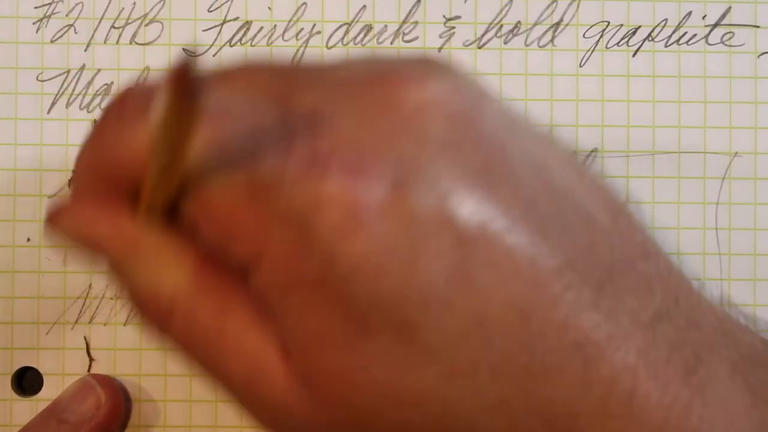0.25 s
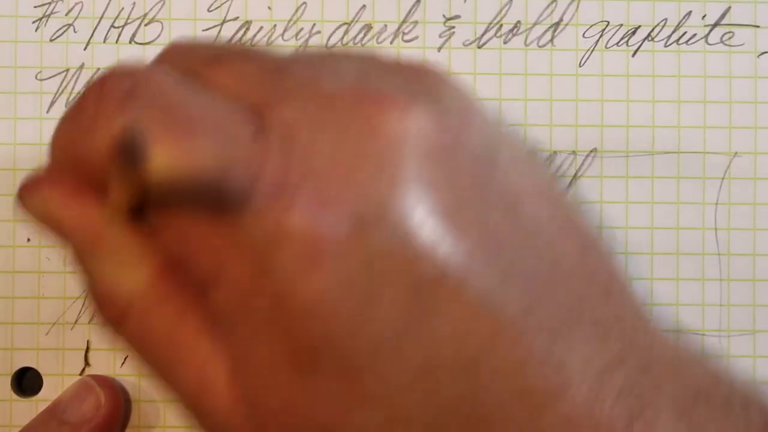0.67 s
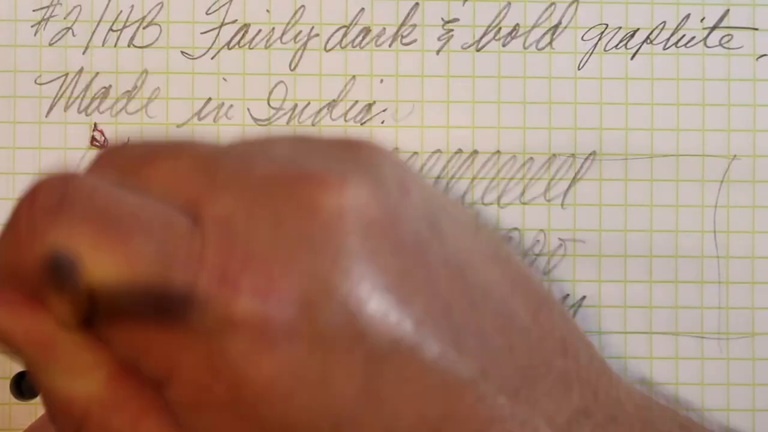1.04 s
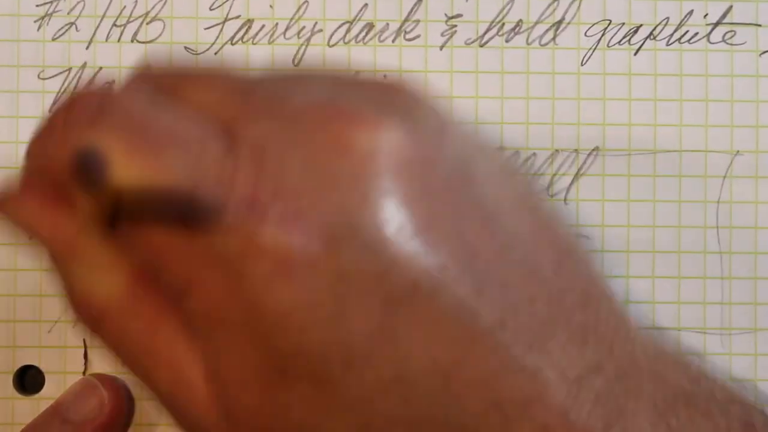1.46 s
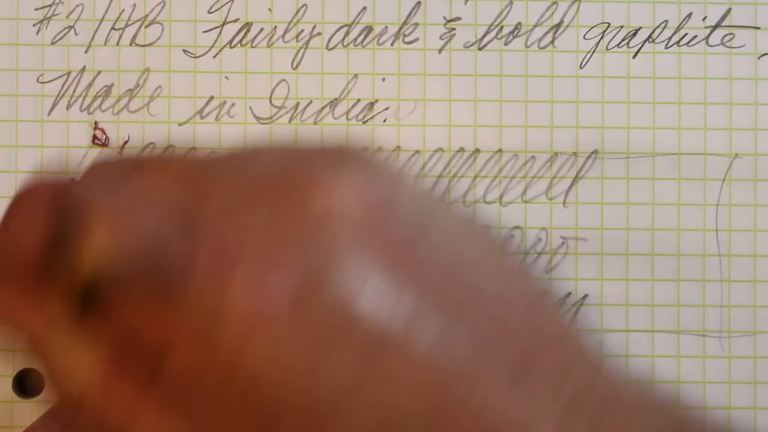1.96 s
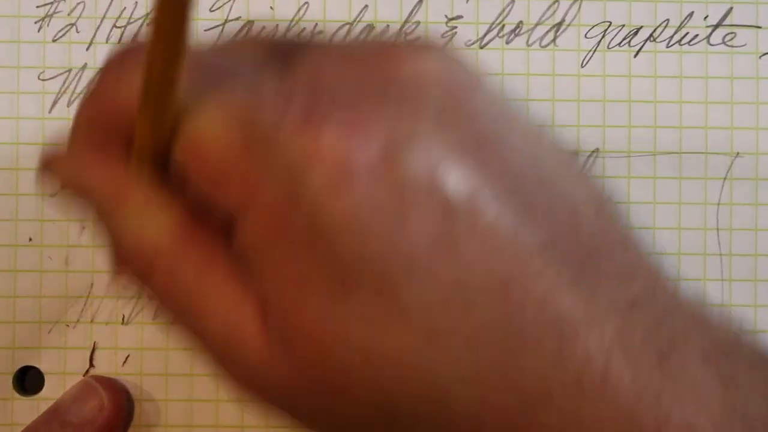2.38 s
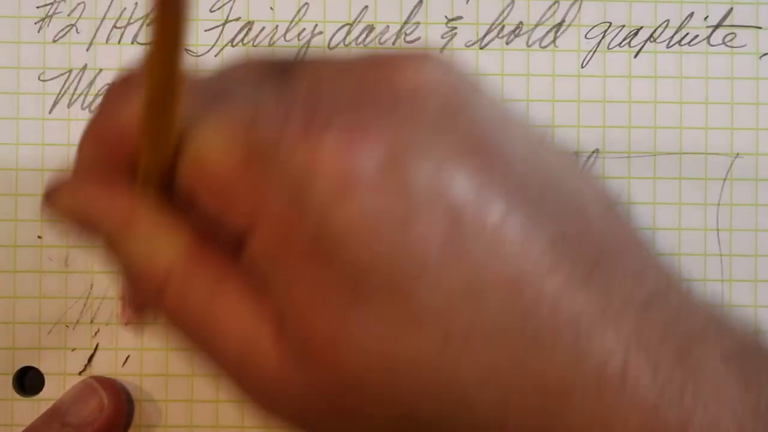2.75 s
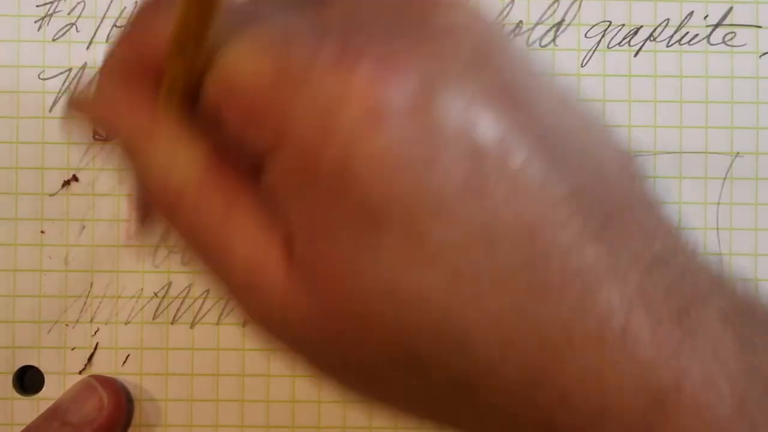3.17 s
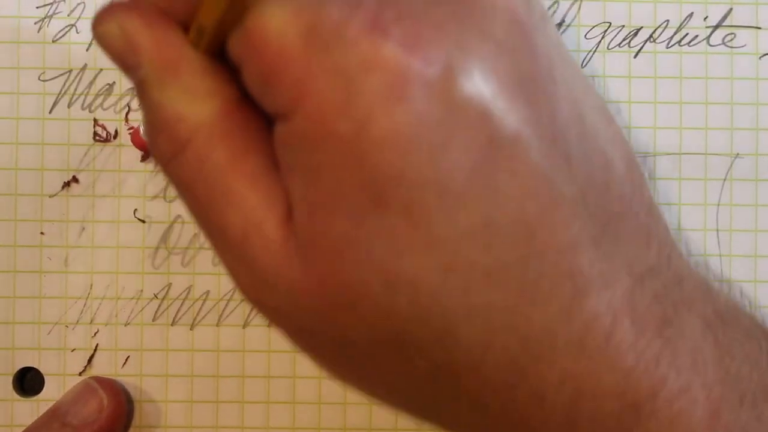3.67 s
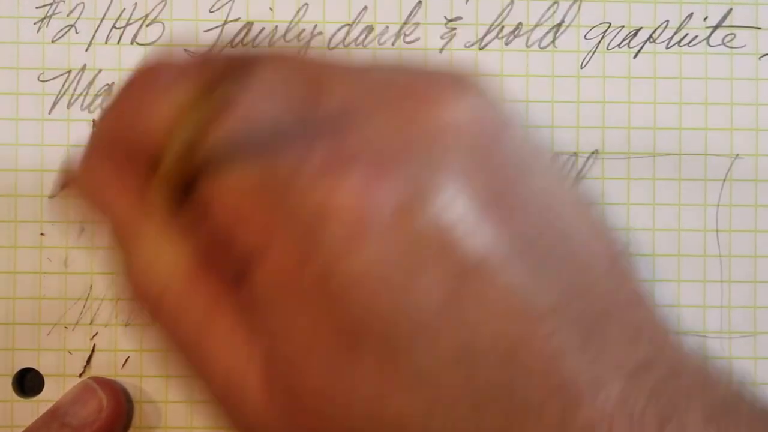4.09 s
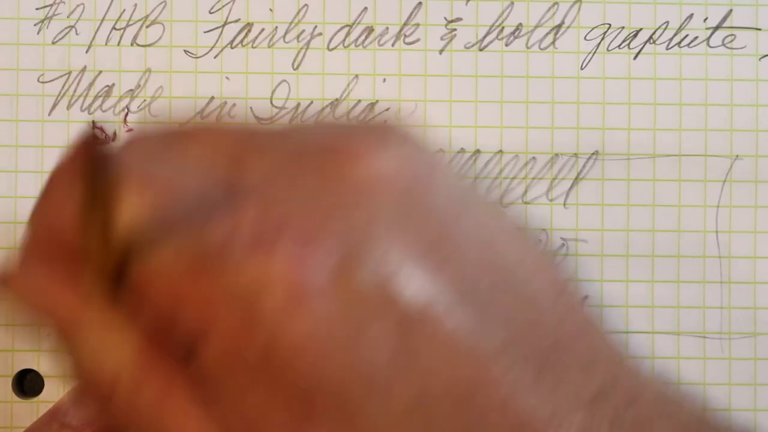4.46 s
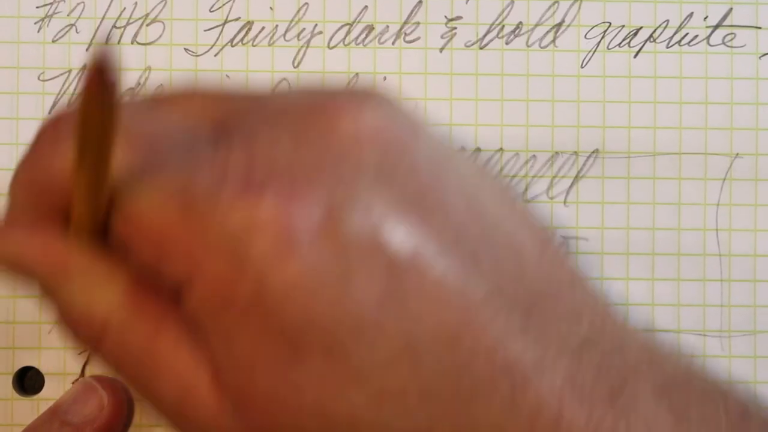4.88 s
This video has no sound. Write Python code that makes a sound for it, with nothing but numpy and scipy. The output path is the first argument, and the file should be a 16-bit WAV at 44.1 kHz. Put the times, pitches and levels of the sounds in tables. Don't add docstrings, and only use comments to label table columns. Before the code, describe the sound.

In a quiet room, miked closely in stereo, an eraser scrubs paper without pause. Alternating strokes give brief dry bursts of bright hiss and papery rasp, the early ones lighter, later ones heavier and scrapier with more pad sound. Dull wooden thumps with tinny rattles peak near two seconds, then mostly soft bumps, paper snaps and small creaks continue. Very short wall echoes, low room noise.

```python
import sys
import numpy as np
from scipy import signal
from scipy.fft import rfft, irfft, next_fast_len
from scipy.io import wavfile

SR = 44100
rng = np.random.default_rng(int(sys.argv[2]) if len(sys.argv) > 2 else 0)


def to_wav(s):
    ch = np.atleast_2d(s).T
    pcm = np.round(np.clip(ch, -1, 1) * 32767)
    wavfile.write(sys.argv[1], SR, pcm.astype(np.int16))


def decibels_to_gain(level_db):
    exponent = np.asarray(level_db, float) / 20
    return 10 ** exponent


N = 226385

# start_s, peak_db, boom_hz, push_s
HAND_THUMPS = [(0.003, -40, 237, 0.049), (0.403, -35.5, 245, 0.018), (0.702, -30.5, 342, 0.0079),
               (0.749, -36.5, 241, 0.012), (0.801, -43.5, 258, 0.014), (0.959, -29.5, 205, 0.024),
               (1.117, -38.5, 232, 0.017), (1.2998, -19.5, 215, 0.012), (1.343, -36, 260, 0.0087),
               (1.427, -43.5, 418, 0.0091), (1.503, -33, 263, 0.0034), (1.599, -17.5, 229, 0.011),
               (1.8845, -13, 205, 0.014), (2.099, -41, 336, 0.023), (2.168, -19.5, 188, 0.016),
               (2.281, -37, 172, 0.009), (2.362, -31.5, 240, 0.013), (2.394, -33, 237, 0.016),
               (2.909, -32, 239, 0.019), (3.107, -30.5, 230, 0.02), (3.299, -37.5, 226, 0.013),
               (3.486, -33.5, 249, 0.017), (3.817, -38, 164, 0.012), (3.859, -32.5, 236, 0.02),
               (4.082, -28, 197, 0.016), (4.36, -41, 220, 0.019), (4.612, -32, 254, 0.015),
               (4.684, -31.5, 232, 0.018), (4.857, -39, 247, 0.0044), (5.001, -33.5, 241, 0.013),
               (4.959, -36, 129, .03), (4.115, -39.5, 260, 0.016), (1.012, -40.5, 272, 0.021),
               (.43, -43, 326, 0.012)]
# freq_hz, density_db (per Hz)
LOW_SHAKE = [(15, -37), (25, -9), (97, -1.5), (170, -8), (220, -31), (370, -120)]
# freq_hz, density_db (per Hz)
AIRY_TOP = [(6200, -1.5), (7200, -2), (8000, -3), (8800, -2), (10000, -6.5), (11500, -11), (13500, -13.5),
            (15800, -25)]


def rms_one(x):
    return x / np.sqrt(np.mean(x ** 2) + 1e-20)


def in_time(rows):
    s, *columns = np.transpose(rows)
    return np.array([np.interp(np.arange(N) / SR, s, c) for c in columns])


def at_hz(points, hz):
    freqs, values = np.array(points).T
    return np.interp(np.log(hz), np.log(freqs), values)


def butter(x, kind, hz, order=2):
    return signal.sosfilt(signal.butter(order, hz, kind, fs=SR, output="sos"), x)


def drift(rate):
    r = np.exp(-80 * np.pi * rate / SR)
    white = rng.standard_normal(N // 40 + 2002)
    slow = signal.lfilter([1], [1, -2 * r, r * r], white)[2000:]
    return np.repeat(rms_one(slow), 40)[:N]


def ring(force, hz, t60):
    r, w = decibels_to_gain(-60 / (t60 * SR)), 2 * np.pi * hz / SR
    return signal.lfilter([0, np.sin(w)], [1, -2 * r * np.cos(w), r * r], force + 1e-18)


def slips(per_s, spread_db):
    shape = (2, 2, N)
    size_db = spread_db * np.minimum(rng.exponential(1, shape), 5)
    sizes = decibels_to_gain(size_db) * rng.choice([-1, 1], shape)
    return sizes * (rng.random(shape) < per_s / SR) + 1e-9


def banded(source, spectrum, low_hz, high_hz, count, patchy_db, rate, alike=1.0):
    # freq_hz, likeness (0-1)
    capsule_likeness = [(60, 0.5), (150, 0.94), (380, 0.49), (950, 0.83), (2380, 0.64), (5980, 0.91),
                        (15000, 0.78)]
    out, edges_hz = 0, np.geomspace(low_hz, high_hz, count + 1)
    for k, (low, high) in enumerate(zip(edges_hz, edges_hz[1:])):
        mid, side = butter(source[k % 2], "band", [low, high])
        hz = np.sqrt(low * high)
        like = np.clip(alike * at_hz(capsule_likeness, hz), 0, .97)
        gain = decibels_to_gain(at_hz(spectrum, hz) + patchy_db * drift(rate))
        spread = np.sqrt(1 - like) * side * np.array([[1], [-1]])
        out = out + gain * (np.sqrt(1 + like) * mid + spread)
    return rms_one(out)


def bursts(events, lengths_s, smooth):
    force = np.zeros(N)
    noise = rng.standard_normal((len(events), 4000))
    t = np.arange(4000) / SR
    for row, length, rough in zip(events, lengths_s, noise):
        length = max(length, .001)
        shape = np.exp(-t / length) * rough / np.sqrt(length * SR / 2)
        shape[0] += smooth
        at = round(row[0] * SR)
        force[at:at + 4000] += decibels_to_gain(row[1]) * shape[:N - at]
    return force


def motion():
    # start_s, length_s, lateness (of top speed), hiss_db, weight_db (on the pad)
    pushes = [(0.108, 0.12, 0.77, -47.5, -2), (0.445, 0.1, 1.17, -46.5, -1.5),
              (0.779, 0.085, 0.66, -50.5, 0.5), (1.062, 0.083, 0.44, -49.5, -0.5),
              (1.321, 0.1, 1, -49, -2.5), (1.578, 0.14, 1.1, -48.5, -2), (1.878, 0.14, 0.87, -54, 9.5),
              (2.285, 0.078, 0.59, -56, 5), (2.63, 0.13, 0.88, -50, 4.5), (3.059, 0.089, 1.2, -49.5, 3),
              (3.416, 0.094, 0.78, -57, 8), (3.78, 0.13, 1.2, -52, 6.5), (4.148, 0.1, 0.69, -51.5, 2.5),
              (4.468, 0.11, 1.12, -49, 0.5), (4.782, 0.11, 1.2, -53, 6.5), (5.105, 0.028, 2.4, -52, 7)]
    # start_s, length_s, lateness, hiss_db, weight_db
    pulls = [(0.318, 0.059, 1.17, -45, -4.5), (0.616, 0.095, 1.05, -47.5, -1),
             (0.932, 0.06, 0.83, -48.5, 2), (1.217, 0.083, 0.6, -46, -2.5), (1.5, 0.074, 0.57, -46.5, -3),
             (1.783, 0.077, 0.69, -43.5, -5.5), (2.065, 0.099, 0.66, -49.5, 2),
             (2.413, 0.13, 1.14, -47.5, 2), (2.824, 0.12, 1.1, -45, -2.5), (3.21, 0.11, 1.07, -45, -2.5),
             (3.583, 0.063, 0.58, -52.5, 5.5), (3.972, 0.098, 1.8, -47, -2.5),
             (4.306, 0.1, 1.44, -50.5, 2.5), (4.633, 0.097, 1.4, -47, -4), (4.96, 0.072, 1.13, -47, -2)]
    for base_shake_db, cruise, rows in ((-13, 1.15, pushes), (-16.5, 1.03, pulls)):
        for s, length, lateness, hiss_db, weight_db in rows:
            progress = np.arange(round(length * SR)) / (length * SR)
            at = round(s * SR)
            speed = np.minimum(cruise * np.sin(np.pi * progress ** lateness), 1)[:N - at]
            shake_db = base_shake_db + 1.75 * weight_db
            yield slice(at, at + len(progress)), speed, hiss_db, weight_db, shake_db


def paper(source):
    # freq_hz, width_hz, level_db
    sheet_modes = [(2260, 32, -5), (2610, 47, 3), (3554, 35, 0.5), (4190, 65, -6), (4930, 190, -2),
                   (5510, 62, -2), (6320, 37, -2), (7120, 43, 1.5), (7540, 70, -9), (8530, 120, -5),
                   (10100, 53, -12.5), (11000, 46, -11)]
    out = 0
    for k, (hz, width_hz, db) in enumerate(sheet_modes):
        t60 = np.log(1000) / (np.pi * max(0.31 * width_hz, 20))
        mid, side = ring(source[k % 2], hz, t60)
        stereo = mid + 0.39 * side * np.array([[1], [-1]])
        out = out + decibels_to_gain(db + 3.5 * drift(9.6)) * stereo / mid.std()
    return rms_one(out)


def rubber():
    # time_s, level_db
    face_contact = [(0, 1), (.5, 0.5), (.95, -2.5), (1.37, 0), (1.8, -1.5), (2.1, -2), (2.5, 1.5), (3.3, 0),
                    (3.6, -3), (3.85, 2), (4.15, -2), (4.35, 3.5), (5.13, -3)]
    # freq_hz, density_db (per Hz)
    rasp_spectrum = [(3300, -5.5), (3650, -2), (4200, -8.5), (4900, -1), (5500, -4), (6200, -5.5)]
    # freq_hz, density_db (per Hz)
    scrape_spectrum = [(290, -31), (500, 1), (994, -7.5), (1080, -11.5), (1380, -4), (1570, -7),
                       (3300, -9.5), (4290, -40), (7260, -120)]
    air, hiss, rasp, scrape, shake = levels = np.zeros((5, N))
    steepness = np.array([[1.4], [1.1], [.85], [.7], [.8]])
    for span, speed, hiss_db, scrape_db, shake_db in motion():
        rasp_db = 0.77 + 0.36 * scrape_db
        loud = decibels_to_gain(hiss_db + np.array([[-7.5], [0], [rasp_db], [scrape_db], [shake_db]]))
        levels[:, span] += loud * speed ** steepness
    source = slips(9000, spread_db=2.5)
    grip = decibels_to_gain(1.5 * drift(30))
    air = air * decibels_to_gain(in_time(face_contact)[0])
    out = air * banded(source, AIRY_TOP, 10030, 16400, count=9, patchy_db=1.5, rate=18, alike=0.71)
    out += hiss * banded(source, AIRY_TOP, 6245, 10230, count=10, patchy_db=2, rate=8.0, alike=0.91)
    out += rasp * banded(source, rasp_spectrum, 3313, 6126, count=12, patchy_db=2, rate=6.6, alike=0.9)
    out += rasp * decibels_to_gain(-6.5) * paper(source)
    out += scrape * banded(source, scrape_spectrum, 513.5, 3094, count=12, patchy_db=2.5, rate=12.4)
    out += shake * banded(source, LOW_SHAKE, 15.6, 170, count=5, patchy_db=2.0, rate=5, alike=1.75)
    return grip * out


def desk():
    # freq_hz, level_db, t60_s
    desk_modes = [(128, -7, 0.2), (202, -8, 0.076), (225, -8, 0.13), (272, 3.5, 0.034), (347, 1, 0.081),
                  (382, -21.5, 0.34), (490, -3, 0.034), (646, -16, 0.047), (740, -22, 0.082)]
    push = np.zeros(N)
    rebounds = [(s + .038, peak_db - 14, hz, length) for s, peak_db, hz, length in HAND_THUMPS]
    for s, peak_db, hz, length in list(HAND_THUMPS) + rebounds:
        t = np.arange(round(3.5 * length * SR)) / SR
        shape = (t / length) ** .7 * np.exp(-(t / length) ** 3)
        boom = decibels_to_gain(peak_db + 4.5) * shape * np.sin(2 * np.pi * hz * t)
        at = round(s * SR)
        push[at:at + len(t)] += boom[:N - at]
    jolt = bursts(HAND_THUMPS, np.array(HAND_THUMPS)[:, 3] * 1.88, smooth=0.44)
    return push + sum(ring(jolt, hz, t60) * decibels_to_gain(db - 5.5) for hz, db, t60 in desk_modes)


def metal(scrubbing):
    # start_s, peak_db, sharpness_db
    jolts = [(0.412, -41, -33), (0.689, -24.5, -24), (0.958, -34.5, -36), (1.0665, -39.5, -19),
             (1.792, -41, -10), (1.2945, -22, -30), (1.3446, -30, -20), (1.59, -17.5, -19),
             (1.8853, -18.5, -18), (1.9244, -45.5, 1.5), (2.083, -41.5, -6), (2.1662, -21.5, -23.5),
             (2.22, -51, -21), (2.3615, -34, -22), (2.394, -45, -3.5), (3.104, -31.5, -19),
             (3.483, -42, -24), (4.0775, -31.5, -32), (4.612, -36.5, -29)]
    # freq_hz, level_db, t60_s
    metal_modes = [(1030, -5, .06), (1200, -5, .08), (1396, -5, .08), (1470, -22, .5), (1565, 0, .11),
                   (1777, -12.5, .6), (1936, -3, .11), (2220, -7, .13), (2412, -10, .16), (2530, -8, .36),
                   (2800, -12, .06), (3200, -6, .17), (3330, -14, .2), (3500, -11, .16), (3706, -2.5, .12),
                   (3941, -12, .14), (4300, -13, .08), (4700, -15, .13), (5100, -15, .13), (5300, -13, .12),
                   (5550, -15, .13)]
    chatter_s, restrike_s, restrike_share, pan_db = 0.00804, .018, .55, -3.5
    lengths, sharp_db = np.full(len(jolts), chatter_s), np.array(jolts)[:, 2]
    sharp_jolts = [(s, peak_db + extra_db) for s, peak_db, extra_db in jolts]
    dull = butter(bursts(jolts, lengths * 4.0, smooth=0.14), "band", [450, 4200])
    sharp = butter(bursts(sharp_jolts, lengths * 1.8, smooth=0.15), "band", [4200, 8000], order=3)
    out = (decibels_to_gain(14.5) * dull + decibels_to_gain(29.0) * sharp) * np.ones((2, 1))
    strengths_db = rng.uniform(-2, 2, (len(jolts), len(metal_modes)))
    splits_hz = rng.uniform(2.3, 58.0, len(metal_modes))
    lags = rng.integers(0, 5, len(metal_modes))
    for k, ((hz, db, t60), lag) in enumerate(zip(metal_modes, lags)):
        share_db = np.clip((hz - 3800) / 1500, 0, 1) * (sharp_db + 24.0)
        force = np.zeros(N)
        for (s, peak_db, _), extra_db in zip(jolts, strengths_db[:, k] + share_db):
            first, later, back = rng.random(3)
            strike = decibels_to_gain(peak_db + extra_db)
            force[round((s + .3 * chatter_s * first) * SR)] = strike
            force[round((s + restrike_s * (.5 + later)) * SR)] = strike * restrike_share * (2 * back - 1)
        force += decibels_to_gain(-36) * scrubbing
        twin_hz = hz + splits_hz[k] * min(1, .15 / t60)
        pair = ring(force, hz, t60) + .4 * ring(force, twin_hz, .6 * t60)
        mode = pair * decibels_to_gain(db - 12.5)
        out += [mode * decibels_to_gain(pan_db / 2), np.roll(mode, lag) / decibels_to_gain(pan_db / 2)]
    return out


def ticks():
    # start_s, peak_db, pitch_hz, t60_s
    buckles = [(0.865, -41.5, 660, 0.014), (1.066, -41, 510, .025), (1.1, -39, 630, 0.013),
               (2.395, -34, 900, 0.012), (1.199, -52, 614, 0.018), (2, -38, 420, 0.015),
               (2.067, -44.5, 546, 0.02), (2.082, -33, 610, 0.012), (2.436, -36.5, 2160, 0.01),
               (2.638, -48, 770, 0.023), (3.425, -46, 611, 0.024), (3.585, -45, 560, 0.022),
               (3.776, -42, 340, 0.025), (3.8185, -28.5, 600, 0.025), (3.815, -39, 500, 0.02),
               (3.828, -38, 250, 0.03), (3.835, -37, 460, 0.04), (3.845, -41, 560, 0.03),
               (3.878, -40, 517, 0.03), (3.885, -42, 680, 0.02), (4.508, -30.5, 1075, 0.025),
               (4.432, -54, 9800, .02), (4.4325, -45.5, 2200, 0.02), (4.434, -57, 7300, .012),
               (4.433, -53, 3500, .01), (4.434, -43, 1200, 0.0089), (4.42, -46, 940, .01),
               (4.45, -47, 700, 0.016), (.437, -54, 9000, .012), (.439, -73, 4500, .012),
               (4.388, -46, 2900, .012), (4.51, -43, 3000, .015), (.6885, -29.5, 1870, 0.019),
               (.694, -29, 520, 0.035), (1.7915, -38, 600, 0.015), (.701, -34, 600, .03),
               (3.6, -47, 530, 0.065), (4.97, -45, 260, 0.028), (4.812, -39, 570, 0.02),
               (4.397, -48, 400, 0.02), (4.954, -41, 600, 0.03), (5.122, -45, 607, 0.05),
               (0.155, -41, 660, 0.012), (1.8905, -24, 420, 0.019), (1.886, -26.5, 1075, 0.018),
               (.42, -49, 1010, 0.04), (0.58, -48, 590, .04), (0.866, -48, 1200, 0.01),
               (1.14, -41, 1800, 0.014)]
    # start_s, peak_db, pitch_hz, t60_s
    creaks = [(1.2572, -29, 1400, 0.02), (1.2632, -21, 1400, 0.013), (1.2645, -32, 3200, 0.008),
              (1.26, -39, 2980, 0.012), (1.284, -37, 2030, 0.01), (1.273, -31, 1500, 0.012),
              (1.2765, -38, 1900, 0.01), (1.261, -35, 1500, 0.01), (1.5515, -41, 2960, .015),
              (1.269, -30, 1400, 0.02), (1.279, -33, 1400, 0.014), (1.5510, -27.5, 1440, 0.016),
              (1.559, -40, 1420, 0.04), (2.535, -56, 1380, 0.11), (2.56, -57, 1374, .1),
              (2.61, -59, 1480, 0.13), (2.579, -58, 1404, 0.17), (4.7350, -62, 1450, 0.23),
              (4.7620, -54, 1490, 0.22), (4.7890, -43, 1480, 0.023)]
    out = np.zeros(N)
    snaps = list(buckles) + list(creaks)
    noise = rng.standard_normal((len(snaps), 500))
    for (s, peak_db, hz, t60), rough in zip(snaps, noise):
        at, force, kick = round(s * SR), np.zeros(6000), round(SR / hz)
        force[:500] = 0.035 * rough * np.exp(-np.arange(500) / 150)
        crackle = 11.0 * butter(force, "band", [900, 3800], order=4)
        force[:kick] += 2 / kick * np.sin(2 * np.pi * np.arange(kick) / kick)
        snap = decibels_to_gain(peak_db + 3.0) * (ring(force, hz, max(t60, .004)) + crackle)
        out[at:at + 6000] += snap[:N - at]
    return out


def sheet():
    # time_s, level_db
    slide_level = [(0, -44), (.015, -48), (.06, -45.5), (.11, -53), (.15, -53), (.2, -104)]
    # freq_hz, density_db (per Hz)
    slide_spectrum = [(900, -35), (1400, 9), (1850, 4), (2350, 12), (2600, 9), (2900, -22)]
    slide_db, = in_time(slide_level)
    source = slips(8600, spread_db=-9.0)
    slide = banded(source, slide_spectrum, 610, 2930, count=9, patchy_db=0.5, rate=11.0)
    fading = banded(source, AIRY_TOP, 3550, 12300, count=4, patchy_db=-7.0, rate=24.0)
    decay = np.exp(-np.arange(N) / (0.01 * SR))
    return decibels_to_gain(slide_db) * slide + decibels_to_gain(-52) * decay * fading


def hand_drag():
    # time_s, level_db
    lean = [(0.0, -44.5), (0.2, -54), (0.41, -58.5), (0.54, -52), (0.94, -49), (1.04, -50), (1.5, -45.5),
            (1.67, -45), (1.97, -61), (2.1, -46), (2.3, -47.5), (2.64, -55), (3.3, -49.5), (3.53, -63),
            (3.87, -55.5), (3.97, -52.5), (4.67, -51.5), (5.13, -61)]
    # freq_hz, density_db (per Hz)
    rumble_spectrum = [(76, -35), (130, 2), (151, -20), (193, -2), (308, -8.5), (351, -2), (409, -5),
                       (600, -29), (780, -35), (1320, -120)]
    # freq_hz, density_db (per Hz)
    shuffle_spectrum = [(290, -34), (500, -4), (624, 2), (909, 0.5), (1200, 0.5), (1820, 0.5), (2080, -2.5),
                        (5000, -16.5), (6500, -49), (11000, -120)]
    lean_db, = in_time(lean)
    lean_db = lean_db - lean_db.mean()
    moving, thumped = np.zeros((2, N))
    for span, speed, *_ in motion():
        moving[span] += speed
    s, peak_db = np.array(HAND_THUMPS)[:, :2].T
    thumped[(s * SR).astype(int)] = decibels_to_gain(peak_db - 19)
    settling = signal.lfilter([1], [1, -np.exp(-1 / (0.022 * SR))], thumped)
    white = rng.standard_normal((2, 2, N))
    rumble = banded(white, rumble_spectrum, 127.5, 615, count=8, patchy_db=4.5, rate=18.0, alike=1.53)
    shuffle = banded(white, shuffle_spectrum, 574, 5200, count=12, patchy_db=2.2, rate=3.0)
    wobble = rms_one(butter(white[0, 0], "band", [45, 133]))
    rumble_level = decibels_to_gain(-57.5 + 0.94 * lean_db + 4 * moving)
    shuffle_level = decibels_to_gain(-60.5 + 1.55 * lean_db) + settling
    return decibels_to_gain(-7.5) * settling * wobble + rumble_level * rumble + shuffle_level * shuffle


def room(x):
    t60_s, wall_cut_hz = 0.25, 1550
    size = next_fast_len(N + SR)
    hz = np.arange(size // 2 + 1) * SR / size
    out = np.zeros((2, len(hz)), complex)
    for k, lag in enumerate(rng.uniform(0.0053, 0.021, 16)):
        loop = decibels_to_gain(-60 * lag / t60_s) / (1 + 1j * hz / wall_cut_hz) * np.exp(-2j * np.pi * hz * lag)
        out[k % 2] += loop / (1 - loop) * (-1) ** (k // 2)
    return irfft(out * rfft(x, size), size)[:, :N]


def background():
    # freq_hz, density_db (per Hz)
    hiss_spectrum = [(100, -32), (170, 4), (226, -1.5), (438, -8.5), (594, -4), (884, -8), (1420, -9),
                     (3030, -13.5), (5050, -15.5), (8750, -20), (14000, -28), (15700, -38)]
    white = rng.standard_normal((2, 2, N))
    hiss = banded(white, hiss_spectrum, 170.0, 15950, count=14, patchy_db=1.0, rate=2.6, alike=0.019)
    roar = banded(white, LOW_SHAKE, 33.2, 197, count=5, patchy_db=1.6, rate=8.4, alike=1.4)
    return decibels_to_gain(-54.5) * hiss + decibels_to_gain(-60.5) * roar


def scene():
    strokes = rubber()
    near = strokes + butter(desk(), "high", 206) + metal(strokes[0]) + ticks() + sheet()
    echo = room(butter(near.mean(axis=0), "high", 860, order=1))
    return near + decibels_to_gain(-22) * echo + hand_drag() + background()


def roll_off(x):
    return signal.sosfilt(signal.butter(12, 15890, fs=SR, output="sos"), x)


def record(dry):
    # freq_hz, left_minus_right_db
    capsule_balance = [(60, -1), (180, -1.0), (550, 0.0), (1650, 0), (4970, 0.5), (15000, 1.0)]
    hz = np.maximum(np.arange(N // 2 + 1) * SR / N, 1)
    tilt = decibels_to_gain(np.array([[.5], [-.5]]) * at_hz(capsule_balance, hz))
    mix = irfft(rfft(dry) * tilt * (hz < 15825), N)
    return roll_off(mix)


dry = scene()
out = record(dry)
to_wav(out)
```